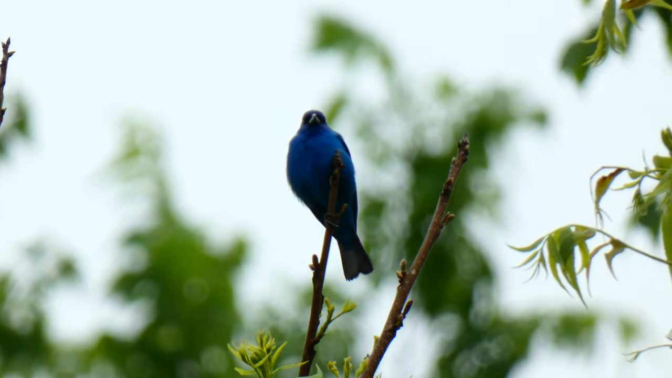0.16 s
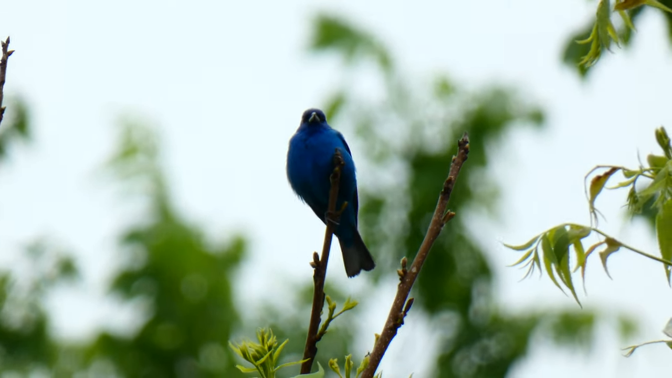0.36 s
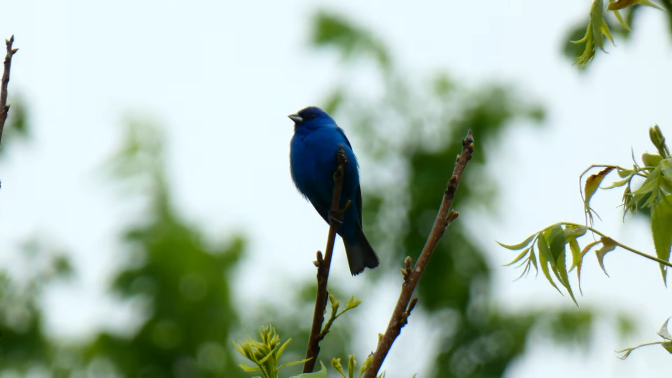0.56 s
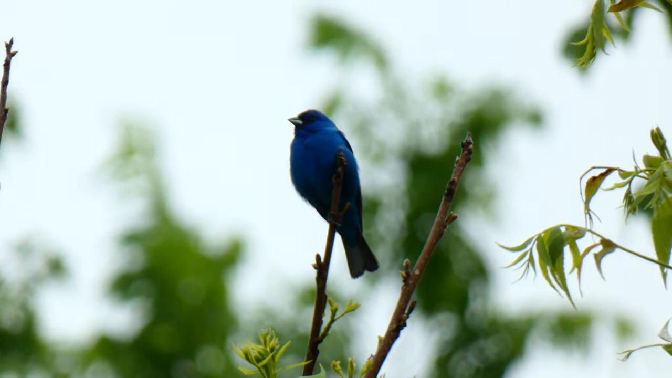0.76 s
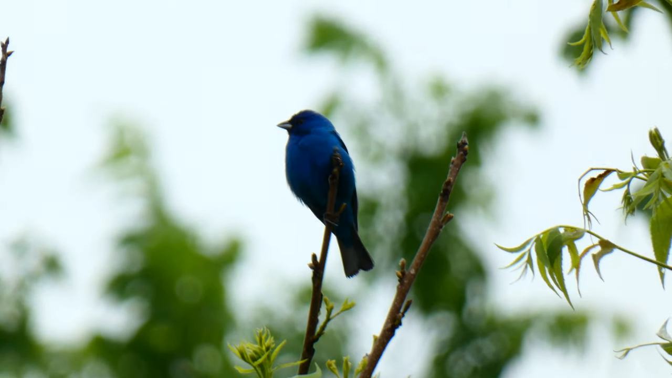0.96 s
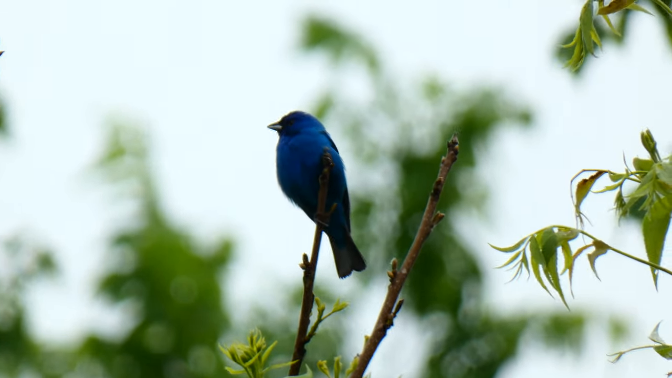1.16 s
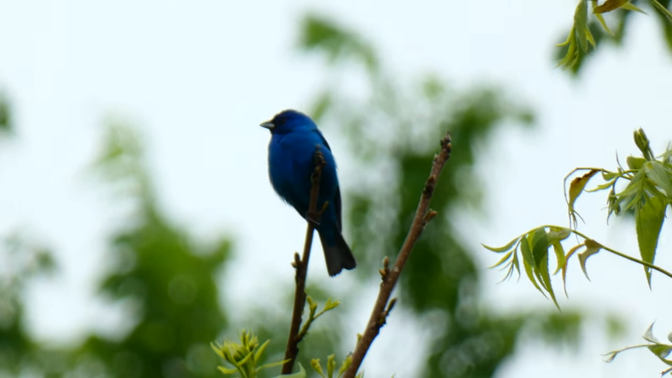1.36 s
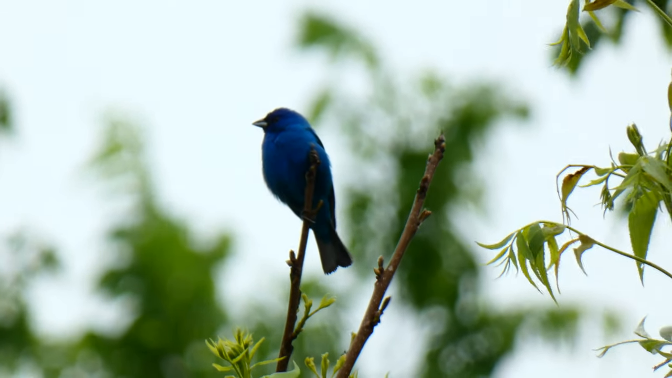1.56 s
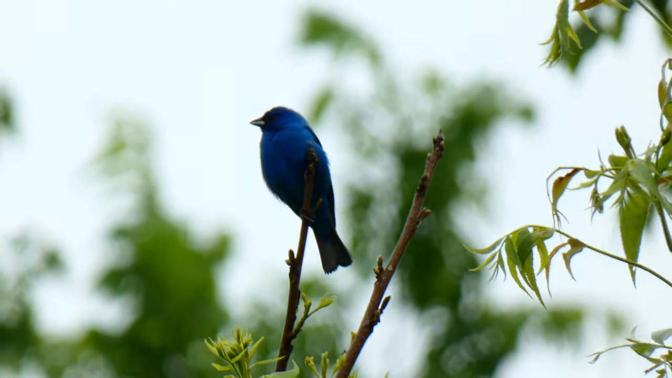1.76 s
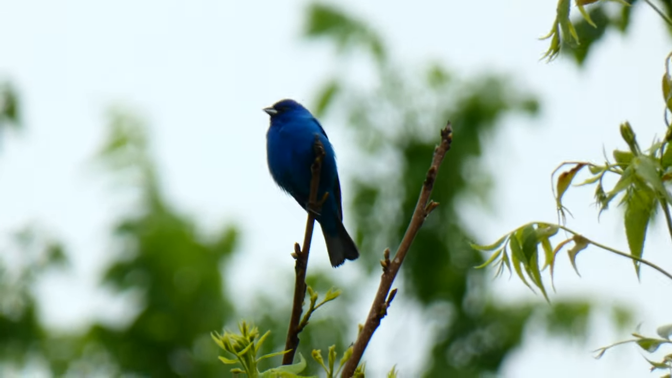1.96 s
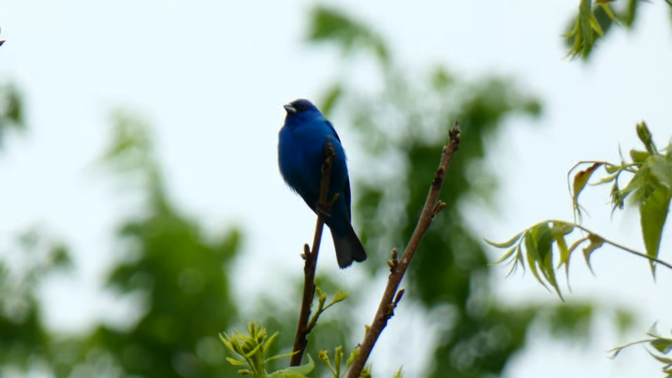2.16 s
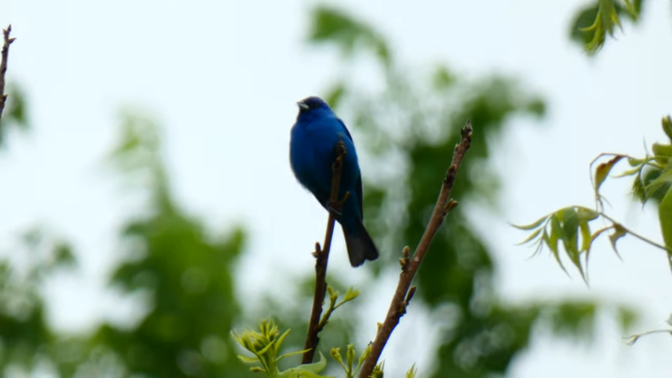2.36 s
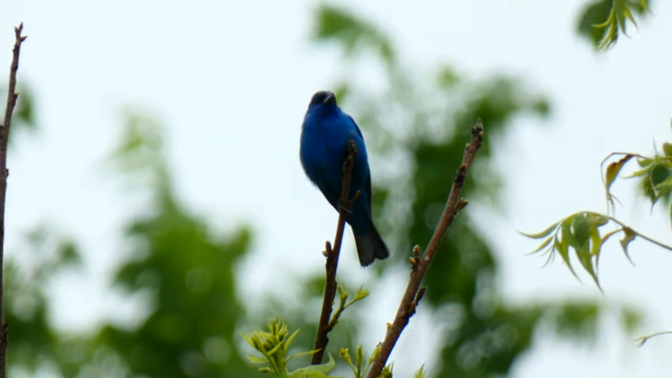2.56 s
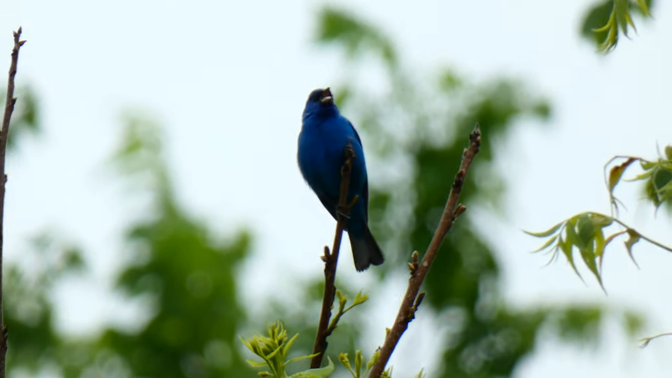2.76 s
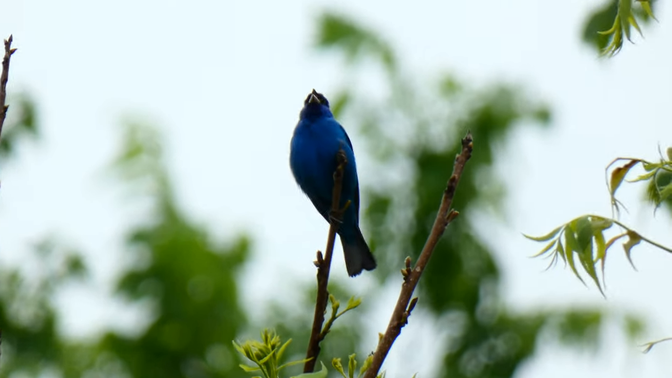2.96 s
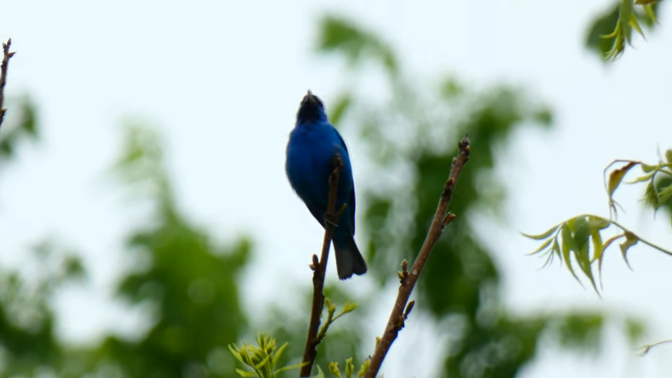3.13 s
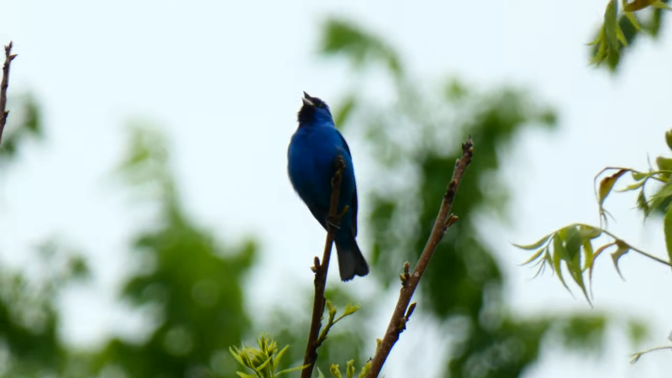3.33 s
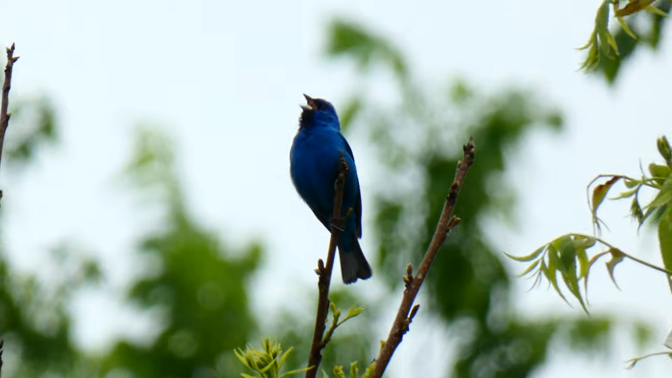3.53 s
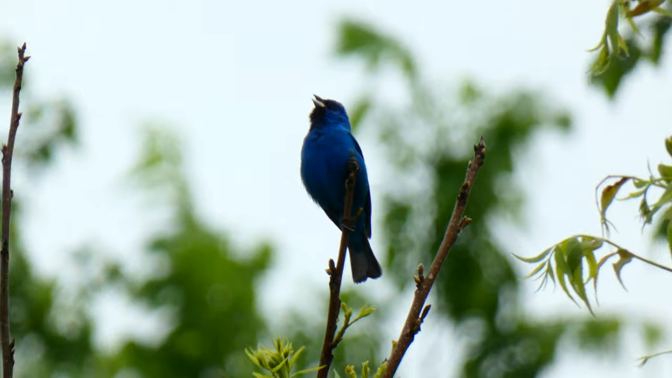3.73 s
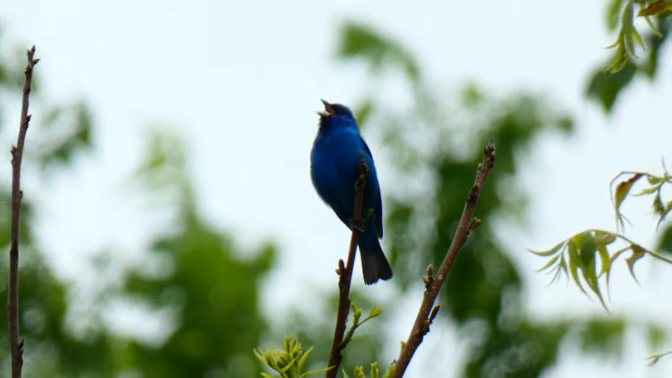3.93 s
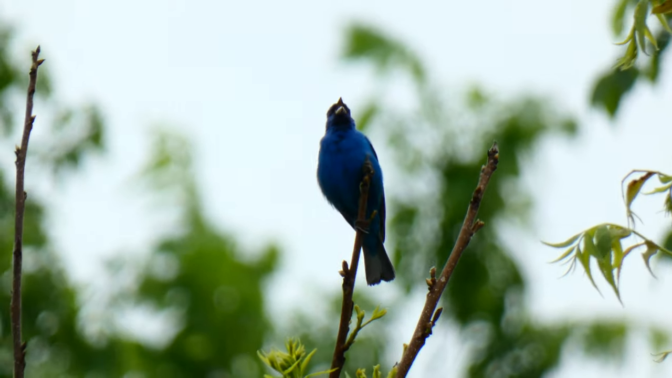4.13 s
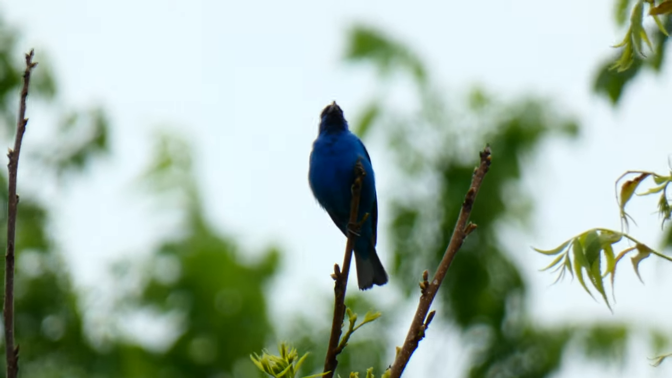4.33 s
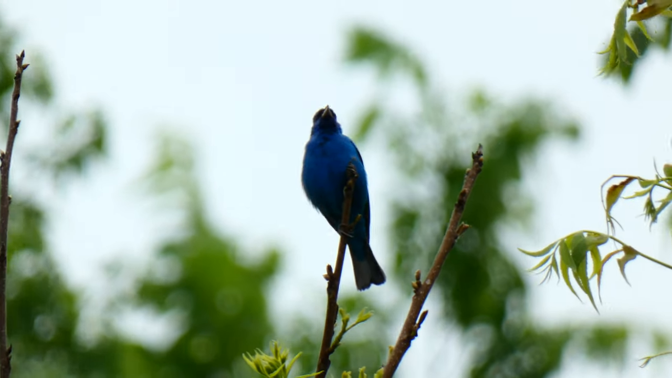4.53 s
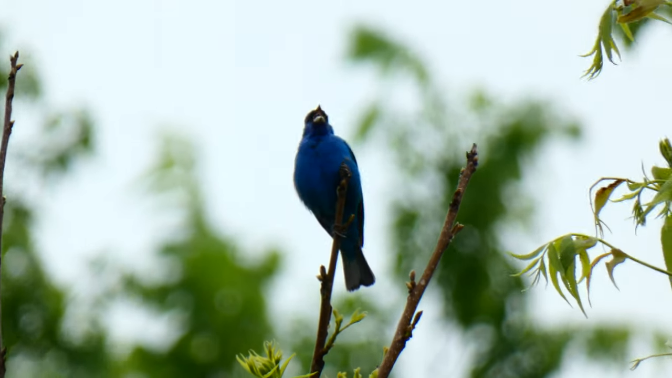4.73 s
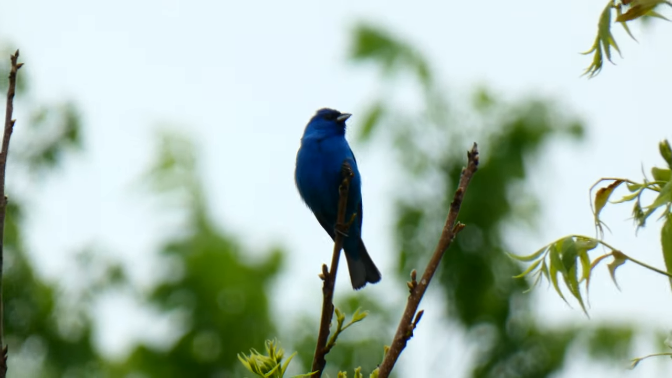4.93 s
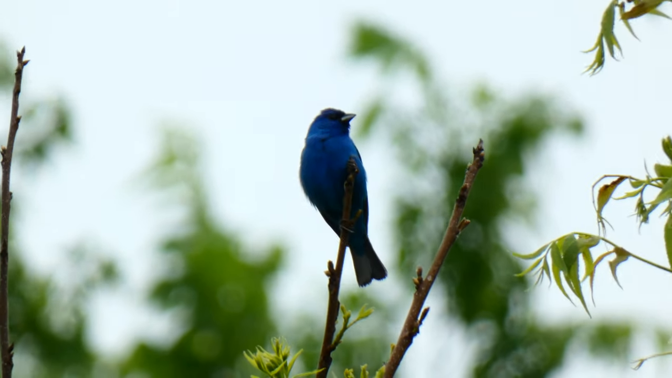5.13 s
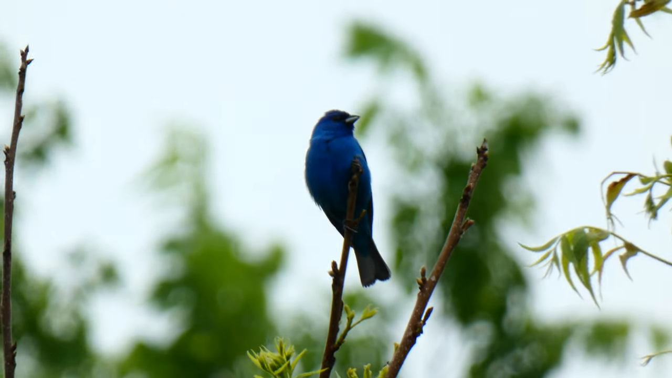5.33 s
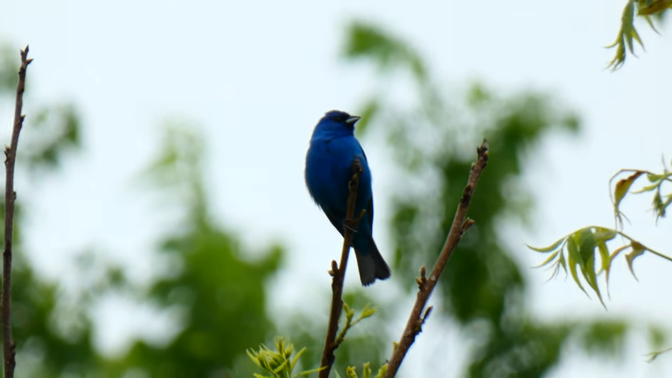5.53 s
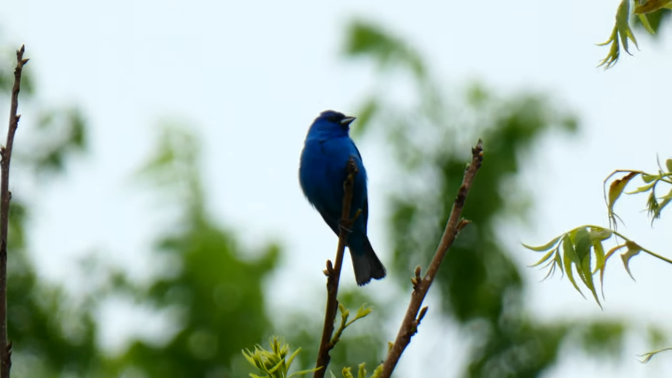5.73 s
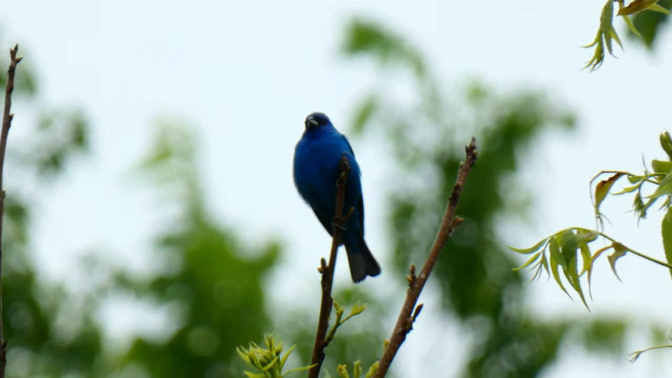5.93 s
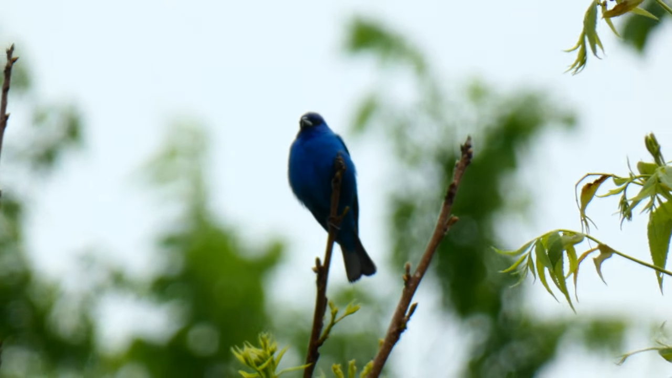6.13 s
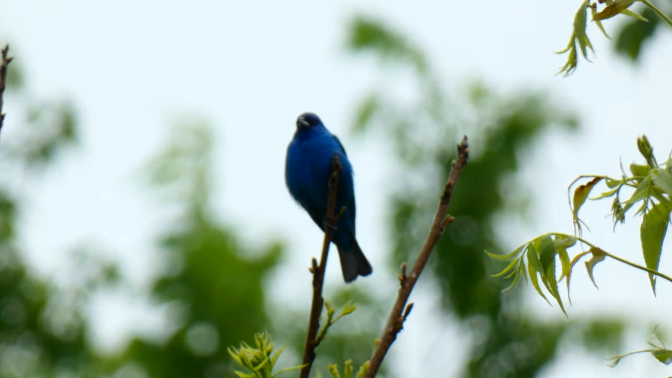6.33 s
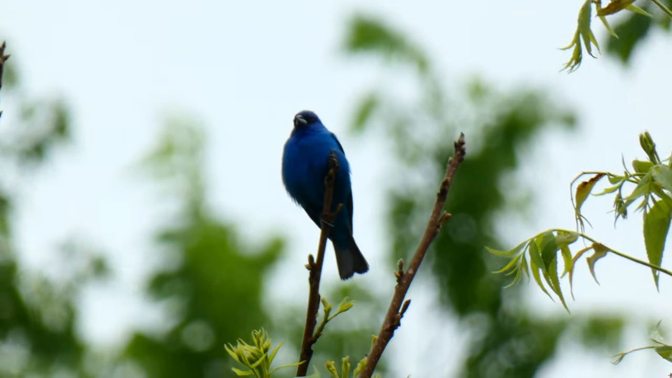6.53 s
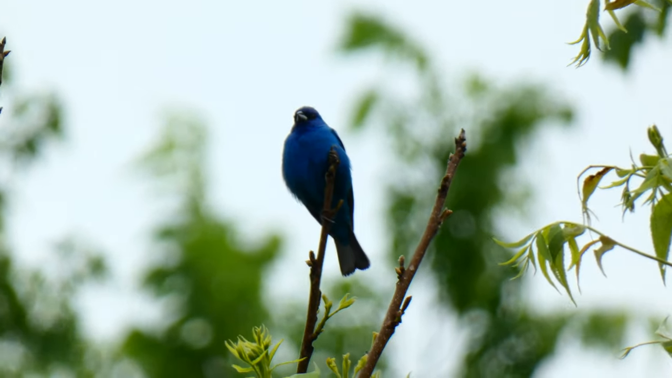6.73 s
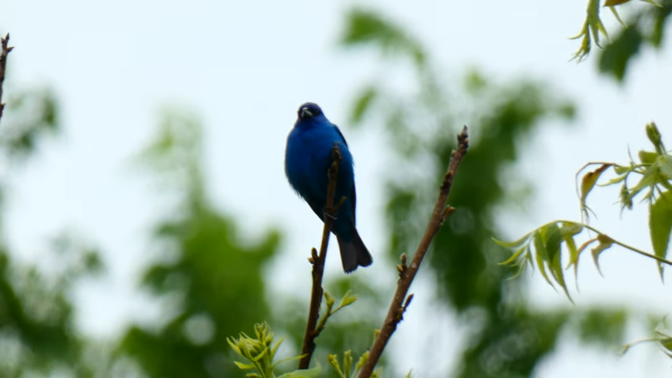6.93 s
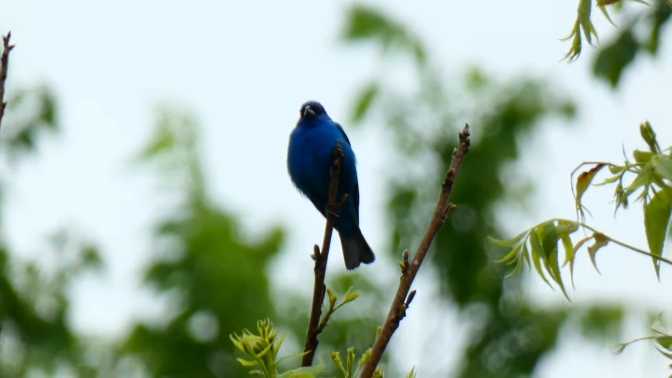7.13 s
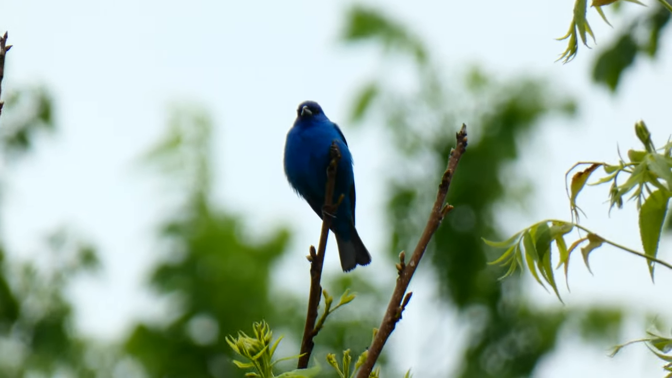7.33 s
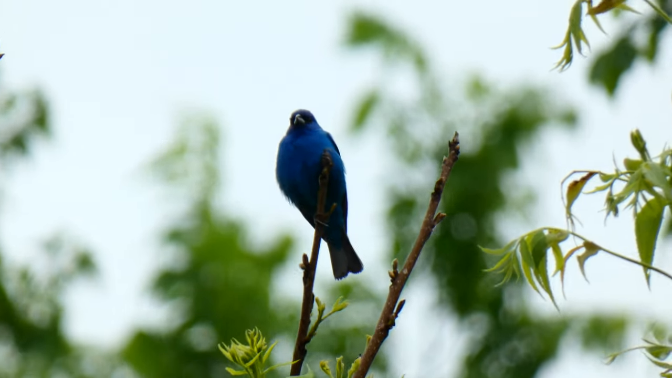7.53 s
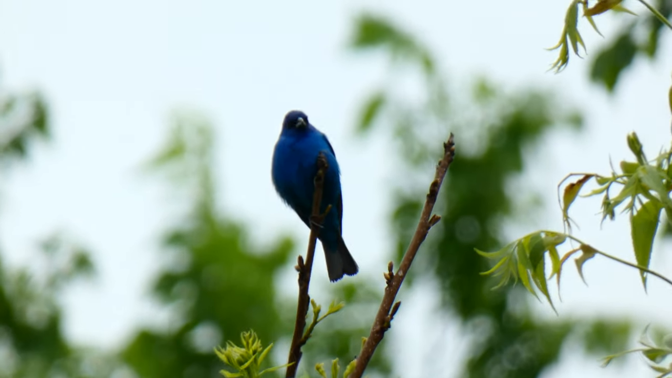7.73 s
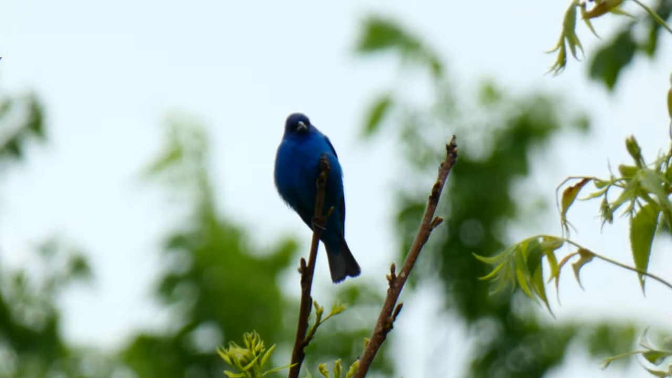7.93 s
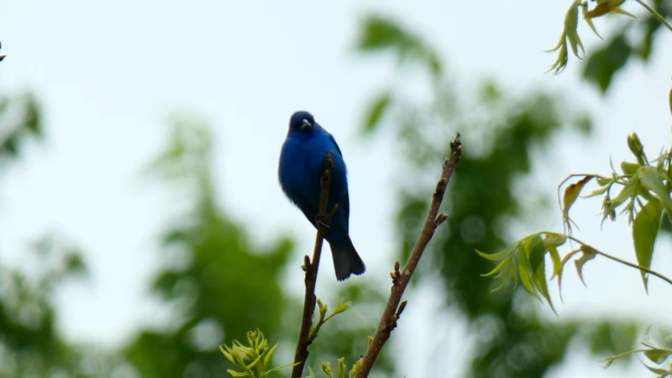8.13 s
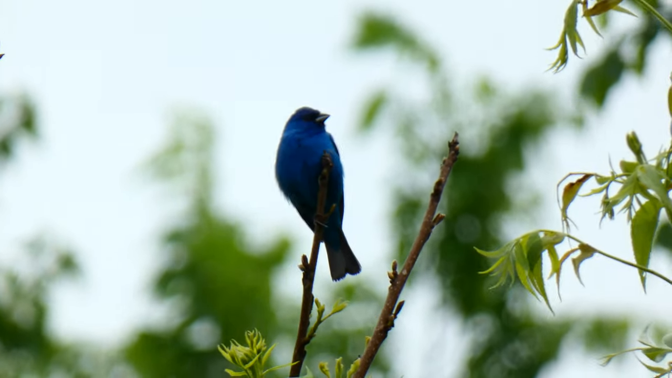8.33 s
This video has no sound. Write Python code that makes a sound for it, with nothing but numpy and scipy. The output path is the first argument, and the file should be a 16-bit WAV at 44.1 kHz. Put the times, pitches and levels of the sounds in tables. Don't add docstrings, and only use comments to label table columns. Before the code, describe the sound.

After quiet outdoor seconds of hiss, low purring and faint far birds, a nearby songbird delivers a short, sharp, echoing song, then falls silent.

```python
import sys
import numpy as np
from scipy import signal
from scipy.fft import rfft, irfft, next_fast_len
from scipy.io import wavfile
from scipy.ndimage import uniform_filter1d

SR = 44100
rng = np.random.default_rng(int(sys.argv[2]) if len(sys.argv) > 2 else 0)


def amplitude_ratio(level_db):
    exponent = np.asarray(level_db, float) / 20
    return 10 ** exponent


def to_wav(sig):
    pcm = np.clip(np.atleast_2d(sig), -1, 1) * 32767
    pcm = np.round(pcm).astype(np.int16)
    wavfile.write(sys.argv[1], SR, pcm.T)


N = 369558
TOP_HZ = 15750


def singer():
    trill_sound, falls = trill(), falling_flicks()
    snaps, notes = snap_notes(), whistled_notes()
    song = main_whistles(notes + snaps) + opening() + trill_sound + falls
    song = song * amplitude_ratio(1.2 * wobble(260))
    haze = song_haze(trill_sound + falls, snaps, notes)

    far_trees = trees(song, gap_s=.03, stretch=1.46, size=SR * 3 // 4) * amplitude_ratio(2.2 * wobble(60))
    far_trees = filtered(far_trees, lambda f: f ** 4 / (f ** 4 + 2600.0 ** 4))
    near_trees = amplitude_ratio(-12) * trees(song, gap_s=0.0031, stretch=0.31, size=SR // 4)
    branch = amplitude_ratio(-14) * trees(song, gap_s=0.001019, stretch=0.058, size=SR // 16)
    middle = song + haze + near_trees + branch + amplitude_ratio(-17.5) * far_trees

    apart = amplitude_ratio(-33) * np.roll(middle, 40) + amplitude_ratio(-7.5) * np.roll(haze, 90)
    apart = apart + amplitude_ratio(-39.5) * np.roll(far_trees, -600)
    return middle, apart * amplitude_ratio(6 * wobble(30))


# (time [s], pitch [Hz], level [dB])
OPENING_NOTES = [
    [(2.545, 5880, -59), (2.555, 5900, -62), (2.583, 5280, -69)],
    [(2.588, 5140, -60), (2.608, 5264, -49), (2.63, 5195, -47), (2.64, 5350, -64)],
    [(2.813, 5990, -47.5), (2.849, 5900, -32.5), (2.869, 6000, -36.5), (2.876, 6000, -46),
     (2.898, 5000, -36), (2.94, 4040, -44), (2.984, 3760, -36.5), (3.002, 3724, -35), (3.008, 3700, -50)],
]
# (time [s], pitch [Hz], level [dB])
PINCHED_NOTE = [
    [(2.754, 6240, -62.5), (2.784, 6730, -42), (2.8, 6750, -45), (2.81, 7030, -51)],
]
# (multiple [times pitch], level [dB])
SOFT_OVERTONES = [(2, -28), (3, -36)]


def opening():
    soft = whistles(OPENING_NOTES, SOFT_OVERTONES, edge_s=.002)
    return soft + whistles(PINCHED_NOTE, [(2, -21)], edge_s=.002)


# (time [s], pitch [Hz], slide [Hz], level [dB])
TRILL_ARCH = [(3.628, 3850, 2500, -29), (3.646, 4140, 2500, -25), (3.665, 4620, 2930, -21),
              (3.686, 5560, 3270, -20), (3.705, 6060, 3340, -21.5), (3.727, 6020, 3530, -22.5),
              (3.759, 5640, 3330, -21), (3.792, 4550, 1900, -24), (3.848, 3720, 1310, -27),
              (3.885, 3370, 1195, -31), (3.912, 3246, 1300, -36.5)]
# (pitch [Hz], slide [Hz], level [dB])
TRILL_SCATTER = [80, 250, .7]


def trill(count=28):
    start_s, gap_s, slows_s, limp_s = 3.629, .00936, .000045, .0005
    k = np.arange(count)
    s = start_s + gap_s * k + slows_s * k * k
    s = s + limp_s * (k % 2 + rng.standard_normal(count))
    knots, *columns = np.transpose(TRILL_ARCH)
    arch = np.transpose([np.interp(s, knots, column) for column in columns])
    rows = np.column_stack([s, arch + rng.standard_normal((count, 3)) * TRILL_SCATTER])
    return flicks(rows, length_s=.017, bend=1.68, flattens=0.37, late=1.5, sharp=1.7, overtones=[(2, -34)])


# (start [s], stretch [times], pitch factor [times], strength [dB])
BURR_TIMES = [
    (3.1092, 1, 0.987, -4),
    (3.3644, 0.98, 1.002, -1),
]


def falling_flicks(count=4):
    rows = []
    for s, stretch, pitch, db in BURR_TIMES:
        for k in range(count):
            hz = pitch * 5880 - 41 * k * k
            slide_hz = -2650 - 115 * k * k
            first_db = -7.5 * (k == 0)
            rows.append((s + stretch * .0133 * k, hz, slide_hz, -22.5 + db + first_db))
    return flicks(rows, length_s=.0165, bend=1.3, flattens=0, late=1.15, sharp=1.3, overtones=[(2, -40)])


# (start [s], stretch [times], pitch factor [times], strength [dB])
SWOOP_TIMES = [
    (4.031, 1.005, 1, 0),
    (4.349, 1.03, 1.003, -0.5),
]
# (time after start [s], pitch [Hz], level [dB])
SWOOP_SNAP = [
    [(0, 4120, -46.5), (.0095, 6530, -26.5), (.0145, 8040, -46.5)],
    [(.0015, 5280, -48), (.0065, 7300, -45.5), (.011, 9570, -40)],
]
# (time [s], pitch [Hz], level [dB])
LAST_SNAP = [
    [(4.729, 4320, -46), (4.732, 5800, -51), (4.735, 9000, -58)],
    [(4.732, 3420, -54), (4.735, 4830, -29.5), (4.738, 6190, -25)],
]


def snap_notes():
    return repeated(SWOOP_SNAP, SWOOP_TIMES) + LAST_SNAP


# (time after start [s], pitch [Hz], level [dB])
BURR_NOTES = [
    [(.05, 2830, -48), (.06, 2820, -50), (.071, 3080, -34.5), (.082, 3060, -45)],
    [(.092, 4440, -38), (.103, 4340, -27), (.125, 4010, -28), (.139, 3766, -23), (.155, 3525, -29),
     (.169, 3507, -35)],
]
# (time after start [s], pitch [Hz], level [dB])
SWOOP_NOTES = [
    [(.021, 7250, -56), (.036, 6520, -30), (.061, 5520, -24), (.081, 4000, -29.5), (.092, 3440, -36.5),
     (.104, 3034, -35), (.115, 2680, -48.5), (.122, 2490, -61), (.13, 2200, -65)],
    [(.136, 3720, -42), (.143, 3760, -40)],
]
# (time [s], pitch [Hz], level [dB])
HELD_NOTES = [
    [(4.174, 2195, -59), (4.188, 3135, -39), (4.197, 3660, -25), (4.21, 4110, -31.5), (4.222, 4200, -25.5),
     (4.26, 4280, -25), (4.27, 4230, -31)],
    [(4.503, 2250, -56.5), (4.52, 3200, -38), (4.531, 3700, -29), (4.544, 4060, -31.5), (4.552, 4240, -27),
     (4.572, 4280, -24), (4.594, 4313, -29.5), (4.6, 4360, -36)],
]
# (time [s], pitch [Hz], level [dB])
CLOSING_NOTES = [
    [(4.738, 5980, -31), (4.745, 4870, -33.5), (4.751, 4610, -27), (4.769, 3584, -31.5)],
    [(4.785, 2870, -46.5), (4.809, 4160, -29.5), (4.817, 5340, -34.5), (4.823, 6170, -29.5),
     (4.863, 6630, -29.5), (4.873, 6540, -41)],
    [(4.871, 8440, -57.5), (4.88, 8020, -46.5), (4.893, 6100, -33.5), (4.915, 5385, -28.5),
     (4.949, 5346, -30), (4.961, 5150, -34.5), (4.965, 5260, -41)],
]


def whistled_notes():
    paired = repeated(BURR_NOTES, BURR_TIMES) + repeated(SWOOP_NOTES, SWOOP_TIMES)
    return paired + HELD_NOTES + CLOSING_NOTES


# (multiple [times pitch], level [dB])
OVERTONES = [(2, -42), (3, -38)]


def main_whistles(notes):
    return whistles(notes, OVERTONES, edge_s=0.0025)


# (frequency [Hz], level [dB per Hz])
HAZE_COLOUR = [(6000, -49.5), (8000, -5.5), (10000, -1.5), (13000, -6.5), (16000, -11)]


def song_haze(flicked, snaps, notes):
    high_notes = filtered(whistles(notes, [], edge_s=.003), lambda f: f ** 6 / (f ** 6 + 4600.0 ** 6))
    slides = flicked + whistles(snaps, [], edge_s=.003) + 0.5 * high_notes
    slides = filtered(slides, lambda f: (f / 6000) ** 0.37)
    flow = uniform_filter1d(np.abs(slides), size=250)
    out = amplitude_ratio(-28) * flow * patchy(hiss(HAZE_COLOUR), depth_db=10)
    return out + amplitude_ratio(-6) * trees(out, gap_s=.004, stretch=.4, size=SR // 8)


def repeated(notes, times):
    return [[(start + stretch * s, pitch * hz, db + gain_db) for s, hz, db in note]
            for start, stretch, pitch, gain_db in times for note in notes]


def whistles(notes, overtones, edge_s):
    out = np.zeros(N)
    for note in notes:
        s, hz, db = np.transpose(note)
        t = np.arange(s[0] - edge_s, s[-1] + edge_s, 1 / SR)
        ends = np.clip(np.minimum(t - t[0], t[-1] - t) / (2 * edge_s), 0, 1)
        glide = uniform_filter1d(np.interp(t, s, hz), size=90)
        gain = np.sqrt(2) * ends * amplitude_ratio(np.interp(t, s, db))
        add_membrane(out, t[0], glide, gain, overtones)
    return out


def flicks(rows, length_s, bend, flattens, late, sharp, overtones):
    out, u = np.zeros(N), np.linspace(-.5, .5, round(length_s * SR))
    puff = np.sin(np.pi * (u + .5) ** late) ** sharp
    ease = np.sin(2.2 * u) / 2.2
    for s, hz, slide, db in rows:
        curl = (bend - flattens * slide / 1000) * (u * u - 1 / 12)
        add_membrane(out, s - length_s / 2, hz + slide * (ease + curl), amplitude_ratio(db) * puff, overtones)
    return out


# (frequency [Hz], level [dB])
BEAK = [(6000, -16), (8500, -3.5), (10500, 2), (13200, 0.5), (16000, -14)]


def add_membrane(out, start_s, hz, gain, overtones):
    turn = 2 * np.pi * (np.cumsum(hz) / SR + rng.random())
    knots = turn[::200]
    broken = amplitude_ratio(5 * np.interp(turn, knots, rng.standard_normal(len(knots))))
    broken = broken * np.sqrt(np.clip(gain / .05, 0, 1))
    tone = np.sin(turn)
    for k, db in overtones:
        tone = tone + broken * amplitude_ratio(db + along(BEAK, k * hz)) * (k * hz < TOP_HZ) * np.sin(k * turn)
    out[round(start_s * SR):][:len(hz)] += gain * tone


# (frequency [Hz], time to fade by 60 dB [s])
TREE_FADE = [(2500, 0.66), (5000, 0.55), (9000, 0.23)]


def trees(x, gap_s, stretch, size):
    out, step = np.zeros(N + 2 * SR), SR // 8
    fade = np.hanning(2 * step + 1)[:-1]
    for a in range(0, N - 2 * step, step):
        piece = x[a:a + 2 * step]
        if piece.any():
            hz, t, z = signal.stft(rng.standard_normal(size), SR, nperseg=256)
            fade_s = stretch * along(TREE_FADE, hz)[:, None]
            tail = signal.istft(z * amplitude_ratio(-60 * t / fade_s), SR, nperseg=256)[1]
            echo = signal.fftconvolve(piece * fade, tail / np.linalg.norm(tail))
            out[a + round(gap_s * SR):][:len(echo)] += echo
    return out[:N]


# (time [s], from [Hz],
# to [Hz], level [dB], length [s])
FAR_NOTES = [(.052, 5800, 6500, -59, 0.015), (.067, 6500, 6750, -57, .025),
             (.135, 6830, 6390, -54.5, 0.058), (.195, 6300, 5840, -63.5, 0.02),
             (.368, 5150, 5850, -66, .012), (.38, 5850, 6550, -60, 0.018), (.4, 6640, 6680, -51.5, 0.046),
             (.45, 6660, 6350, -53, 0.087), (.53, 2780, 2430, -65.5, 0.063), (.89, 2770, 2390, -68, 0.038),
             (1.05, 2900, 2720, -66, 0.027), (1.2, 3080, 2960, -65, 0.033), (.49, 2995, 2960, -72, .02),
             (1.0, 2900, 2600, -70, .03), (.42, 2750, 2940, -78, .05), (1.49, 6730, 6200, -64, 0.074),
             (1.725, 6330, 4890, -60.5, 0.11), (1.997, 6500, 4920, -58.5, 0.052),
             (2.1, 6000, 4600, -63, 0.027), (2.075, 6730, 6550, -68, 0.085), (2.33, 6560, 6320, -60.5, .09),
             (2.43, 6460, 6520, -68.5, 0.1), (2.55, 6530, 6500, -66, .12), (5.12, 6980, 5880, -55, 0.047),
             (5.145, 6000, 5900, -64, 0.014), (5.2, 6200, 5680, -60, 0.017),
             (3.347, 5570, 6700, -53.5, .01), (3.618, 4170, 4700, -41, .008), (3.926, 3007, 3500, -47, .01),
             (5.57, 7420, 8000, -66, 0.15), (6.53, 7440, 7550, -74, 0.092), (6.68, 7700, 7800, -72.5, .12),
             (6.92, 7550, 7500, -72, .08), (7.45, 7180, 7200, -73.5, .15), (5.76, 6050, 5960, -76, 0.059),
             (.885, 5900, 5880, -70, .03), (1.26, 6650, 6500, -77, .1), (2.635, 7740, 7700, -71, .03),
             (5.865, 5900, 6900, -64, 0.077), (7.31, 6940, 5690, -60, 0.034),
             (7.345, 5800, 4840, -68.5, 0.024), (7.385, 5680, 6780, -59, 0.0148),
             (1.92, 7800, 7650, -65, 0.072)]
# (time [s], from [Hz], to [Hz], level [dB], length [s])
BUZZES = [(.06, 7730, 7850, -60, 0.24), (.22, 6500, 5800, -67, 0.082), (.45, 8240, 7600, -62, 0.17),
          (6.05, 7700, 6500, -82, .15), (1.77, 5850, 5700, -63, 0.07), (1.79, 6730, 6500, -61.5, 0.12),
          (1.91, 7800, 7650, -73, 0.089), (2.01, 5900, 5650, -58, 0.15), (2.03, 5300, 5200, -63, .1),
          (2.29, 5600, 4700, -63, .15), (2.075, 6680, 6360, -56.5, 0.1), (2.19, 5470, 5000, -63, 0.23),
          (5.56, 6860, 7400, -66, 0.073), (7.37, 6380, 6100, -65, 0.06), (7.38, 5300, 5700, -73, .2),
          (5.92, 7000, 7100, -70, .2), (5.65, 7200, 7600, -74, .4), (.62, 6300, 6300, -70, .1)]


def far_birds():
    notes = whistles(settling(FAR_NOTES, slide_s=.027, fade_db_per_s=109), [], edge_s=.004)
    buzzes = whistles(settling(BUZZES, slide_s=0.088, fade_db_per_s=52), [], edge_s=0.012)
    buzzes = buzzes * unit(wobble(700))
    direct = notes * amplitude_ratio(5 * wobble(220)) + buzzes
    sent = amplitude_ratio(2) * notes * amplitude_ratio(2.5 * wobble(220)) + buzzes
    near_echo = amplitude_ratio(-8) * trees(sent, gap_s=.004, stretch=.5, size=SR // 4)
    far_echo = amplitude_ratio(-7) * trees(sent, gap_s=.02, stretch=1.4, size=SR // 2)
    return amplitude_ratio(-6) * direct + near_echo + far_echo


def settling(rows, slide_s, fade_db_per_s):
    notes = []
    for s, hz0, hz1, db, length in rows:
        turn = .9 * length
        if abs(hz1 - hz0) > 450:
            turn = min(slide_s, turn)
        notes.append([(s, hz0, db), (s + turn, hz1, db - fade_db_per_s * turn),
                      (s + length, hz1, db - fade_db_per_s * length)])
    return notes


# (middle [s], half length [s], rise [dB])
INSECT_BOUTS = [
    (.3, 0.38, 12),
    (1.8, 1, 5),
    (5.95, 0.57, 15),
    (6.801, 0.36, 13.5),
]


def insect():
    band = filtered(rng.standard_normal(N), lambda f: np.exp(-((f - 4900) / 80) ** 2))
    return level(-87.5, INSECT_BOUTS) * amplitude_ratio(-3.5) * unit(band * amplitude_ratio(3.9 * wobble(40)))


# (time [s], peak [dB], pitch [Hz], left minus right [dB])
TWIG_TICKS = [(0.361, -47.5, 7900, 4), (0.632, -49, 9000, 0.0), (0.79, -51, 8900, 0.0),
              (0.9536, -49, 9100, 4), (1.119, -48, 9450, 2), (2.294, -39.5, 10800, 3),
              (2.8373, -44.5, 6800, 2), (5.5404, -58, 7110, -13), (5.775, -48.5, 7930, -2),
              (5.86, -65, 7800, -6), (6.0119, -49, 7180, -1), (6.468, -51, 9360, 1), (6.838, -45, 7850, -1),
              (6.965, -56.5, 7600, -5), (7.468, -54, 7140, 0.0), (7.678, -61, 7150, 0.0),
              (7.7617, -60, 7300, -1), (7.9885, -60, 7150, 6), (8.203, -46, 10700, 4)]


def ticks():
    out, t = np.zeros((2, N + SR)), np.arange(SR // 100) / SR - .0013
    crackle = []
    for a, b, c, d in rng.random((round(16 * N / SR), 4)):
        crackle.append((a * N / SR, -63 - 1.7 * np.log(b + 1e-3), 6000 + 6000 * c, 8 * (d - .5)))
    for s, db, hz, pan_db in TWIG_TICKS + crackle:
        snap = np.exp(-(t / .00013) ** 2) * np.sin(2 * np.pi * hz * t)
        rattle = .2 * amplitude_ratio(-60 * np.abs(t) / .012) * rng.standard_normal(len(t))
        sides = amplitude_ratio(db + 6.5 + np.array([[.5], [-.5]]) * pan_db)
        out[:, round(s * SR):round(s * SR) + len(t)] += sides * (snap + rattle)
    return filtered(out[:, :N], lambda f: f * f / (f * f + 5000 ** 2))


# (time [s], peak [dB], pitch [Hz])
KNOCKS = [(0.275, -50, 816), (0.468, -47.5, 833), (0.633, -47, 788), (0.702, -44, 832), (0.772, -49, 851),
          (0.858, -52, 793), (0.934, -48, 827), (1.044, -48.5, 800), (1.087, -54, 813), (1.181, -48, 850),
          (2.166, -51, 800), (2.203, -49, 780), (2.361, -49, 850), (2.388, -48, 813), (2.455, -47, 810),
          (2.653, -55, 805), (2.699, -46, 783), (2.869, -40, 802), (3.039, -55, 800), (3.191, -47, 800),
          (3.326, -48.5, 817), (3.385, -51, 806), (3.458, -44, 775), (3.717, -43.5, 800),
          (3.793, -42.5, 816), (3.9, -46.5, 799), (4.161, -46, 805), (4.312, -51, 804), (4.401, -52, 800),
          (4.416, -45, 797), (4.607, -44.5, 836), (4.669, -48, 836), (4.702, -44, 844), (4.882, -51, 800),
          (4.913, -48, 783), (5.0, -48, 810), (5.571, -45.5, 813), (5.745, -48.5, 853), (5.808, -51, 773),
          (6.011, -45, 812), (6.205, -43.5, 810), (6.29, -44, 800), (6.323, -46, 823), (6.402, -48, 790),
          (6.479, -43.5, 823), (6.535, -47.5, 800), (6.599, -46, 810), (6.691, -43, 805),
          (6.804, -48.5, 804), (7.114, -52, 810), (7.436, -50, 830), (7.678, -44.5, 786), (7.776, -46, 799),
          (7.98, -49.5, 828), (8.009, -50, 826), (8.116, -51, 806), (8.143, -42, 812), (8.184, -41, 810),
          (8.281, -43, 816), (8.334, -48.5, 789),
          (6.4, -46, 950),
    (4.435, -43.5, 797),
    (4.457, -45.5, 764),
    (3.5, -43, 740),
    (5.1, -42.5, 824),
    (7.5, -46, 780),
    (7.2, -49, 800),
    (8.03, -45.5, 890),
]
# (frequency [Hz], level under the strongest mode [dB])
KNOCK_UPPER = [(1070, -15.5), (1300, -19.5), (1715, -19), (2100, -18), (420, -21)]


def knocks():
    out, t = np.zeros(N + SR), np.arange(SR // 15) / SR
    for s, db, hz in KNOCKS:
        upper = sum(rng.random() * amplitude_ratio(mode_db) * np.sin(2 * np.pi * mode_hz * t)
                    for mode_hz, mode_db in KNOCK_UPPER)
        ring = (1 - np.exp(-t / 0.0038)) * amplitude_ratio(-60 * t / 0.053) * np.sin(2 * np.pi * hz * t)
        tap = (1 - np.exp(-t / .0007)) * amplitude_ratio(-60 * t / 0.033) * upper
        out[round(s * SR):][:len(t)] += amplitude_ratio(db + 6.5) * (ring + tap)
    return out[:N]


# (middle [s], half length [s], rise [dB])
MOTOR_SURGES = [
    (0.804, 0.55, 3),
    (2.748, 0.36, 3),
    (3.707, 0.49, 3.5),
    (4.65, 0.17, 1),
    (6.345, 0.33, 1.5),
    (8.3, 0.27, 2),
]
# (frequency [Hz], width [Hz], level [dB])
HOUSING_MODES = [(339, 168, -9.5), (414.5, 35.3, -4), (614, 120, -17.5), (811.2, 114, 1), (1009, 29, -11.5),
                 (1184, 90, -14), (1331, 223, -16.5), (1708.2, 113, -9), (2090, 147, -11.5),
                 (2349, 75, -16.5)]


def motor():
    shared = 2.2 * wobble(45)
    out = np.zeros(N)
    for c, w, db in HOUSING_MODES:
        jolts = rng.standard_normal(N) * amplitude_ratio(db + shared + 2.37 * wobble(25))
        out += filtered(jolts, lambda f: (1j * f * w / (c * c - f * f + 1j * f * w)) ** 2)
    return level(-60, MOTOR_SURGES) ** .6 * amplitude_ratio(-22) * unit(out)


# (middle [s], half length [s], rise [dB])
GUSTS = [
    (1.3, 0.95, 5.4),
    (2.5, 0.25, 2.8),
    (3.15, 0.4, 10.3),
    (3.9, 0.12, 2.1),
    (5.0, 0.24, 6.7),
]
# (frequency [Hz], level [dB per Hz])
RUMBLE_COLOUR = [(12, -76), (20, -45.5), (53, -27.5), (57, -22.5), (68, -15.5), (118, 0), (151, -5),
                 (184, 1.5), (259, -20), (280, -11), (360, -25), (620, -120)]


def wind():
    rumble = unit(hiss(RUMBLE_COLOUR) * amplitude_ratio(0.81 * wobble(7.2)))
    return level(-62, GUSTS) * amplitude_ratio(1.6 * wobble(4.4)) * rumble


# (middle [s], half length [s], rise [dB])
LEAF_SWELLS = [
    (.8, 2, -1.5),
    (5.796, 0.85, 0),
    (7.7, 1.8, -2.5),
]
# (frequency [Hz], level [dB per Hz])
LEAF_COLOUR = [(1470, -37), (2500, -1.5), (3630, -1.5), (4240, -7), (4840, -1), (5480, -4.5), (7020, 0.5),
               (8270, -7.5), (9890, -3), (14800, -15), (16000, -14.5)]


def leaves():
    return level(-66.5, LEAF_SWELLS) * amplitude_ratio(0.78 * wobble(30)) * patchy(hiss(LEAF_COLOUR), depth_db=4.5)


# (frequency [Hz], level [dB per Hz])
APART_COLOUR = [(35, -35), (60, -7.5), (621, -7), (822, -3), (882, -11.5), (2050, -13), (4120, -20.5),
                (4420, -20), (7400, -15.5), (9790, -12.5), (16000, -16)]


def microphone_difference():
    return amplitude_ratio(-75) * patchy(hiss(APART_COLOUR), depth_db=10)


def patchy(x, depth_db):
    z = signal.stft(x, nperseg=512)[2]
    field = uniform_filter1d(uniform_filter1d(rng.standard_normal(z.shape), size=2, axis=0), size=9, axis=1)
    dips = np.minimum(unit(field), .3)
    return unit(signal.istft(z * amplitude_ratio(depth_db * dips), nperseg=512)[1][:N])


def thinned(x, holes_db, rarity):
    hz, _, z = signal.stft(x, SR, nperseg=1024)
    field = uniform_filter1d(uniform_filter1d(rng.standard_normal(z.shape), size=3, axis=0), size=11, axis=1)
    slots = np.minimum(unit(field) + rarity, 0) * (hz[:, None] > 1200)
    return signal.istft(z * amplitude_ratio(holes_db * slots), SR, nperseg=1024)[1][:N]


def hiss(spectrum):
    return unit(filtered(rng.standard_normal(N), lambda hz: amplitude_ratio(along(spectrum, hz))))


def level(rest_db, swells):
    t = np.arange(N) / SR
    return amplitude_ratio(rest_db + sum(db * np.exp(-((t - s) / half_s) ** 2) for s, half_s, db in swells))


def wobble(rate):
    knots = rng.standard_normal(int(N * rate / SR) + 4)
    return np.interp(np.arange(N) * rate / SR, np.arange(len(knots)), knots)


def filtered(x, response):
    m = next_fast_len(N + SR // 2)
    return irfft(rfft(x, m) * response(np.fft.rfftfreq(m, 1 / SR)), m)[..., :N]


def along(points, hz):
    f, v = np.transpose(points)
    return np.interp(np.log(hz + 1), np.log(f + 1), v)


def unit(x):
    return x / np.sqrt(np.mean(x ** 2) + 1e-20)


def scene():
    song, song_side = singer()
    background = thinned(motor() + wind() + leaves(), holes_db=22, rarity=1.35)
    middle = song + far_birds() + insect() + knocks() + background
    side = song_side + microphone_difference()
    return np.array([middle + side, middle - side]) + ticks()


def band_limit(x):
    return signal.sosfilt(signal.butter(12, 16360, fs=SR, output="sos"), x)


def record(dry):
    mix = filtered(dry, lambda hz: hz < TOP_HZ)
    return band_limit(mix)


dry = scene()
out = record(dry)
to_wav(out)
```